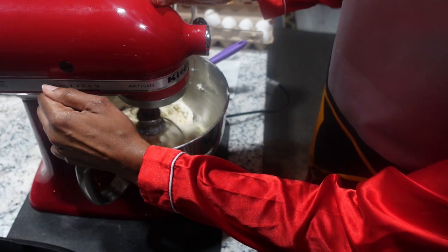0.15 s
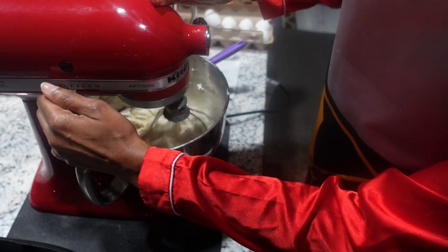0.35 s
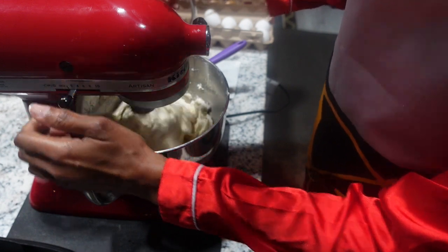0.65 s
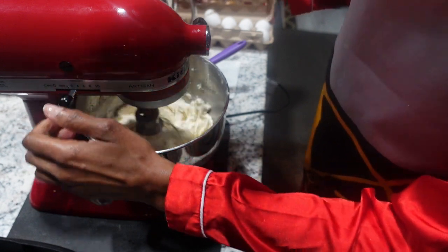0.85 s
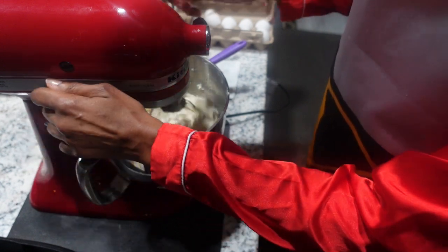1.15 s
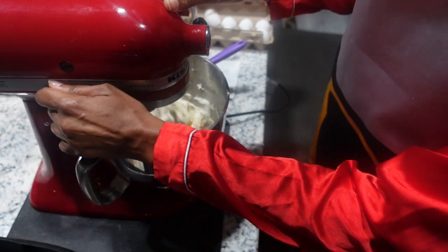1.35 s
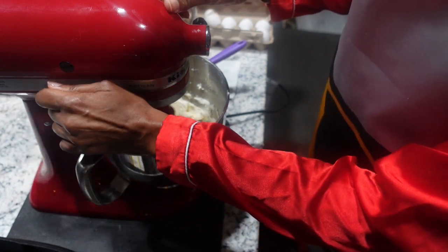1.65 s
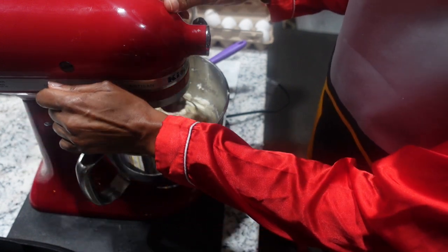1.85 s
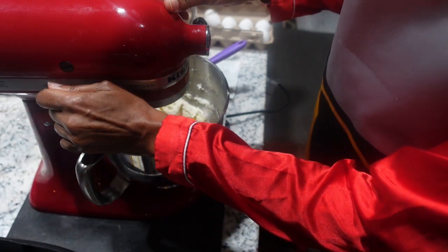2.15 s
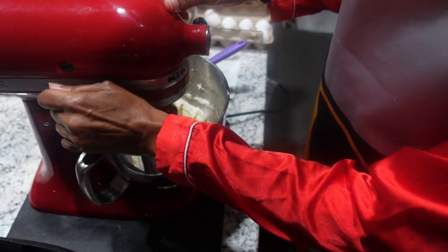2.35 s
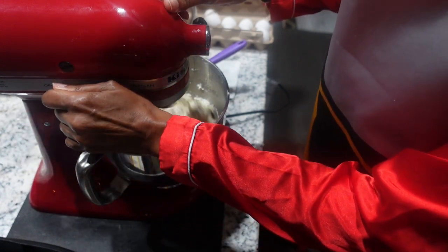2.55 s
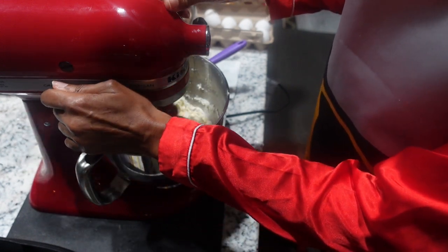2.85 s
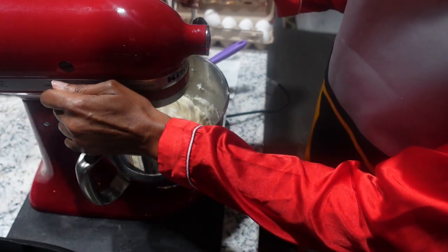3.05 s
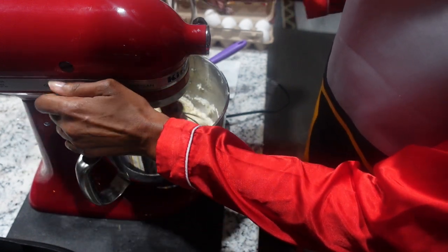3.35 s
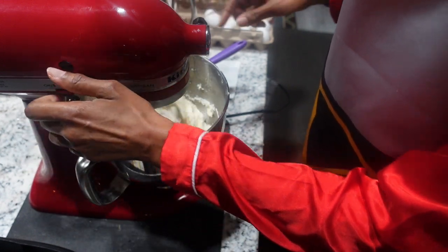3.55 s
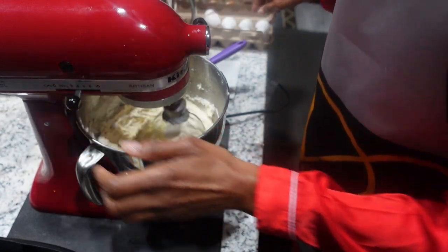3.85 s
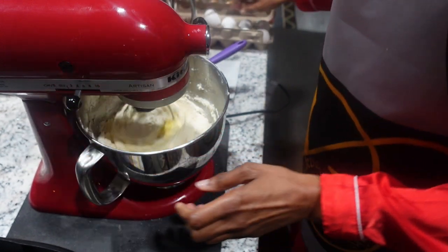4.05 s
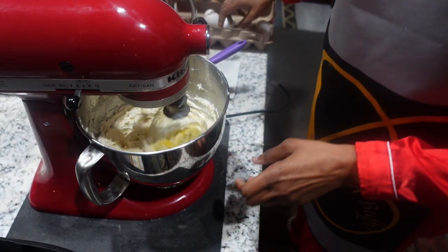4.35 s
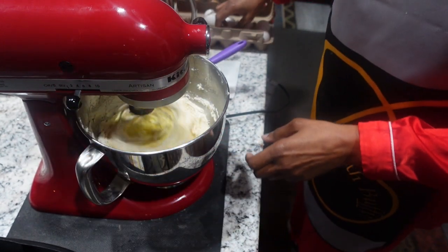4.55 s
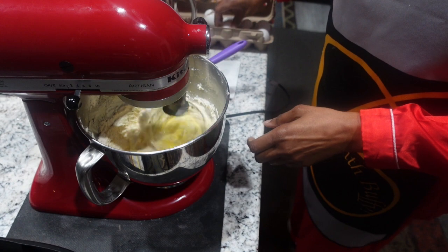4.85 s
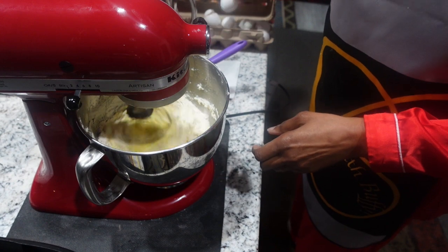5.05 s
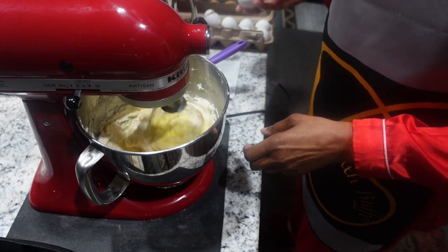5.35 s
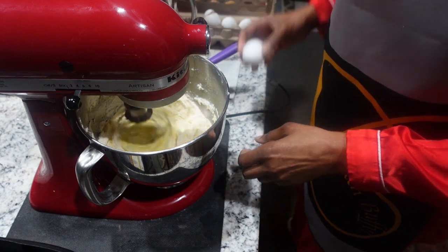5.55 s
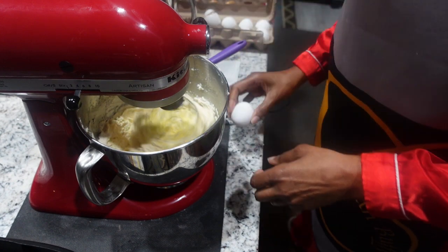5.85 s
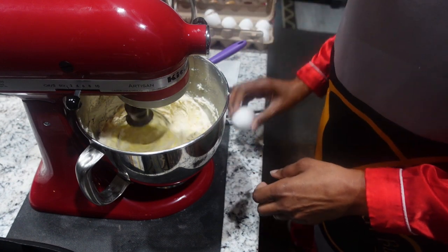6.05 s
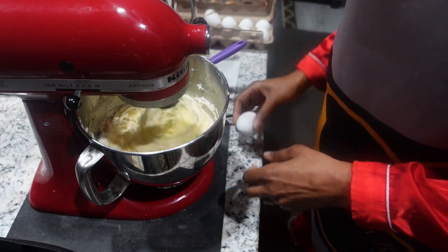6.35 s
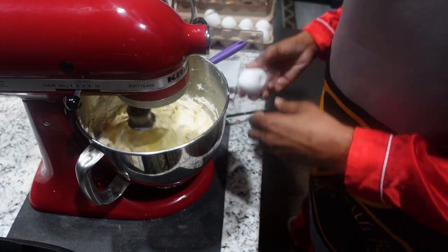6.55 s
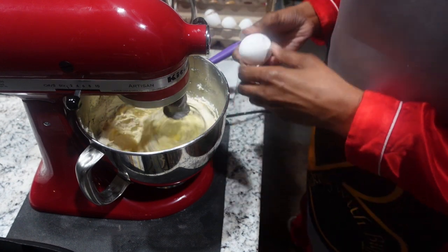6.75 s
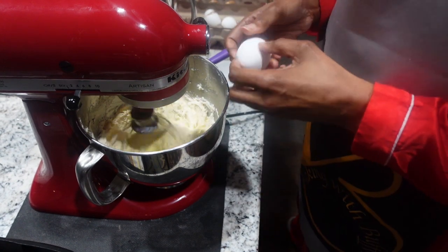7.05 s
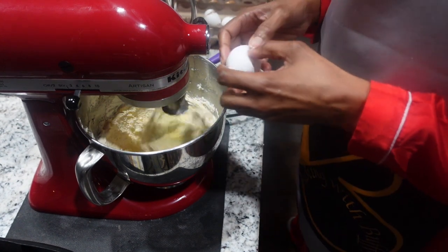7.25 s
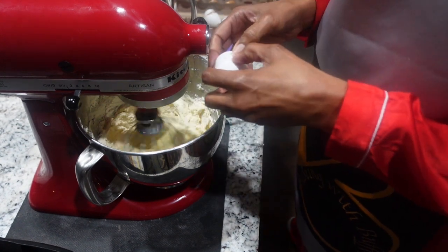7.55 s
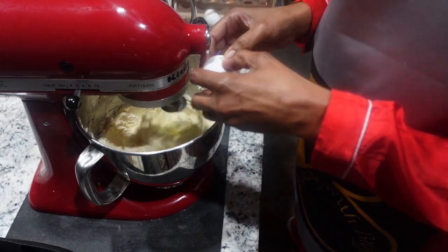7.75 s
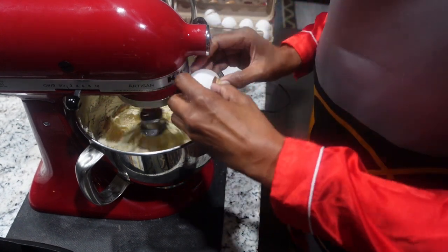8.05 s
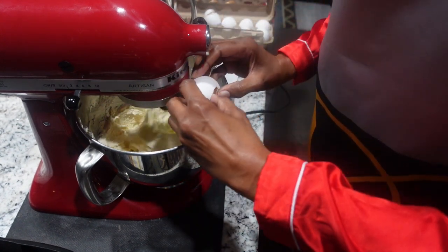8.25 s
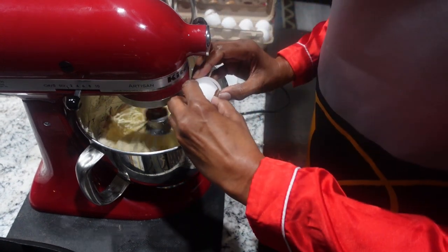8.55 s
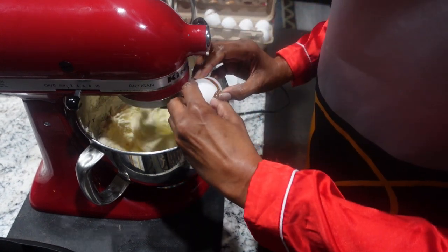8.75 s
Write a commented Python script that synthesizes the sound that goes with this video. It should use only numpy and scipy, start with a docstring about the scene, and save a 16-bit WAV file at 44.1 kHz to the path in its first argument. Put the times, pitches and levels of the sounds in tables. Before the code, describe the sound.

A stand mixer dominates throughout, heard close in a kitchen with only a short room tail. First a slow buzzing motor with chirping brush squeak and a light lever click; then a quick climb in pitch with gear chatter into a brighter, steadier fast whine, gently pulsing as the whisk circles the batter. An egg is tapped hard, then its shell snaps faintly apart near the end.

```python
"""A stand mixer's motor hums and whines at slow speed, with brush hiss and squeaks, then surges to fast.
It whisks batter in a steel bowl; later an egg is knocked on the counter and its shell is broken open.
Motor tones are cosines locked to the shaft and the mains ripple, with resonances of the housing.
Gears and brushes are filtered noise that follows the turning shaft; the clicks are fading noise bursts."""
import sys
import numpy as np
from scipy import signal
from scipy.fft import rfft, irfft, next_fast_len
from scipy.io import wavfile
from scipy.ndimage import uniform_filter1d, minimum_filter1d, map_coordinates

SR = 44100
rng = np.random.default_rng(int(sys.argv[2]) if len(sys.argv) > 2 else 0)


def to_wav(sig):
    """Store sig (one row per channel, or 1-D mono) as 16-bit WAV at the path in sys.argv[1].

    Samples outside -1..1 are clipped; the rate is SR.
    """
    pcm = np.clip(np.atleast_2d(sig), -1, 1) * 32767
    pcm = np.round(pcm).astype(np.int16)
    wavfile.write(sys.argv[1], SR, pcm.T)  # frames by channels


N = 393147
TIME = np.arange(N) / SR  # seconds

# motor speed set by the lever, before the whisk's drag: (time [s], shaft speed [turns per second])
SHAFT_SPEED = [(0, 49.44), (.04, 49.43), (.15, 66), (.23, 67.6), (.39, 66.52), (1.44, 66.52), (2.01, 70.27),
               (2.35, 71.68), (2.43, 85.04), (2.5, 93.1), (2.6, 100.2), (2.68, 101), (2.9, 99.63),
               (3.3, 100.8), (3.6, 99.64), (4.2, 100.7), (4.5, 99.75), (4.85, 98.38), (5.4, 98.43),
               (5.7, 99.62), (6.5, 98.94), (8.91, 98.59)]
# shaft speeds taken as slow and fast, and the ripple of the mains current
SLOW_HZ, FAST_HZ, RIPPLE_HZ = 67, 99, 120
# armature slots; motor turns in each worm gear throb; motor turns in each orbit of the whisk
SLOTS, WORM_RATIO, ORBIT_RATIO = 22, 5, 47.7
# motor tones at shaft order x speed + ripple order x ripple, before resonance and level changes:
# (shaft order [-], ripple order [-], slow level [dB], fast level [dB])
MOTOR_TONES = [(0, 1, -67.5, -66), (1, 2, -56, -39.5), (0, 3, -42.5, -39.5), (3, 1, -49, -40.5),
               (0, 3.5, -40, -43), (-1, 4, -31.5, -54), (1, 3, -28.5, -45), (-2, 5, -59, -50),
               (-3, 6, -54, -38), (2, 2, -59, -38.5), (0, 4, -50, -40.5), (-1, 6, -47.5, -62),
               (1, 5, -47.5, -35.5), (0, 6, -46, -43), (-2, 7, -39.5, -56), (-4, 8, -53, -53),
               (-1, 7, -36.5, -43.5), (-2, 8, -66, -48), (1, 6, -45, -79), (9, 0, -107, -44),
               (10, 0, -63, -38.5), (15, 0, -55, -50.5), (22, -3, -64, -47.5), (22, -2, -39, -49),
               (22, -1, -41, -41.5), (22, 0, -40, -41), (22, 1, -39, -50.5), (22, 2, -64, -46.5),
               (21, 0, -44, -49.5), (21, 1, -68, -50.5), (23, -1, -68, -55), (23, 0, -44, -49),
               (29, 0, -46, -53), (44, -1, -72, -45), (43, 0, -61, -49.5), (44, 0, -47.5, -43.5),
               (44, 1, -56, -38), (44, 2, -50.5, -45.5), (43, 1, -57, -58), (45, 0, -58, -40.5),
               (66, 0, -51, -42.5), (66, 1, -44.5, -47), (88, 0, -68, -44)]
# sharp housing resonances that the motor tones sweep through: (frequency [Hz], width [Hz], height [dB])
SHARP_HOUSING = [(2162, 44.6, 20), (2962.3, 124, 6), (3950, 190, 7)]
# gear and brush noise at slow and at fast speed, before resonance: (frequency [Hz], level [dB per Hz])
SLOW_NOISE = [(25, -86), (90, -87.5), (200, -82), (320, -70), (560, -71), (900, -67.5), (1500, -70),
              (2600, -74), (4500, -72), (5300, -82), (6100, -69), (8000, -79.5), (11000, -79),
              (15500, -91.5)]
FAST_NOISE = [(25, -91), (90, -91), (200, -82), (320, -69.5), (560, -72), (900, -63.5), (1300, -73),
              (2000, -68.5), (2900, -75.5), (4200, -72.5), (5300, -78.5), (6900, -71), (10000, -79.5),
              (15500, -90)]
# housing resonances that colour this noise: (frequency [Hz], width [Hz], height [dB])
NOISE_HOUSING = [(150, 32, 2.5), (328, 44, 5.5), (419.3, 34, 14), (685, 47, 2.5), (752, 21, 7.5),
                 (1100, 35, 10), (1487, 52, 3.5), (2124, 70, 8), (3010, 100, -3.5), (7200, 130, -11)]
# brush rasp around multiples of the slot rate, before the contact gate:
# (multiple [-], slow level [dB], fast level [dB])
RASP_BANDS = [(2, -49, -56), (3, -55, -45), (4, -48, -48.5), (5, -50.5, -51.5), (6, -53, -54.5),
              (7, -55, -71)]
# overall brush squeak, before the contact gate and throb: (time [s], level [dB])
SQUEAK_LEVEL = [(0, -81), (.3, -58), (.9, -48), (1.1, -47), (1.55, -41), (1.9, -45), (2.2, -46.5),
                (2.45, -67)]
# the bands that make up the squeak: (frequency [Hz], width [Hz], relative level [dB])
SQUEAK_BANDS = [(4390, 590, -3.5), (5030, 290, -3), (6270, 500, -14), (8560, 500, -14), (10430, 140, -2),
                (14800, 400, -22)]
# faint mains hum: (time [s], level [dB])
MAINS_LEVEL = [(0, -62), (.2, -63), (.5, -54), (2.4, -70), (2.6, -61), (4.05, -77), (5.6, -69), (6.3, -76),
               (8.91, -75)]
# clicks of speed lever, eggshell and bowl, levels before fading:
# (time [s], crack level [dB], knock level [dB], crack's 60 dB fading time [s], resonance [Hz])
CLICK_EVENTS = [(.078, -25, -36, 0.034, 5670), (1.575, -29, -46, 0.034, 7496),
                (5.625, -43, -23.5, 0.079, 1100), (6.132, -9, -30, .017, 5400),
                (6.15, -30, -31, 0.14, 1686), (7.143, -30, -32, .025, 3400), (7.186, -31, -47, .02, 5800),
                (8.797, -14, -32, .016, 2900), (8.83, -36, -47, 0.013, 12370)]
# tone colour of every crack and every knock: (frequency [Hz], relative level [dB])
CRACK_COLOUR = [(500, -26), (1800, 10), (2900, 6.5), (4000, -2), (5400, 3.5), (9000, 4), (13000, 2.5),
                (16000, 2)]
KNOCK_COLOUR = [(60, -42), (170, -4), (350, 1), (1100, 3), (2000, -11), (3500, -16), (8000, -31)]
# balance of the microphone pair: (frequency [Hz], left minus right [dB])
STEREO_TILT = [(60, 0.0), (110, -1.5), (200, 1.5), (380, -0.5), (700, 2), (1290, 2), (2380, 2.5),
               (4400, 3.5), (8120, 3.5), (15000, 3.5)]
# how alike the noise is at the two microphones: (frequency [Hz], likeness [0-1])
STEREO_LIKENESS = [(60, 0.6), (130, 0.6), (290, 1.0), (640, 0.94), (1410, 0.92), (3100, 0.96), (6820, 1),
                   (15000, 0.88)]
# the whine shifts between the ears as the cook moves: (time [s], left minus right [dB])
WHINE_BALANCE = [(0, 2.5), (3.2, 1), (4.4, 1.5), (6, 1), (8.2, -1.8)]
# level changes of the whine and of the low hum: (time [s], level [dB])
WHINE_LEVEL = [(0, -3), (.1, 3), (.2, -3.5), (1, -0.5), (2, -7), (2.53, 3), (2.63, -1), (3.75, 1),
               (4.15, -3), (4.6, 3.5), (5.2, 1), (5.5, -5), (5.87, 2), (6.15, 0), (6.45, 3), (7.15, -1.5),
               (8.15, 2.5), (8.91, 1)]
HUM_LEVEL = [(0, 2), (.1, -3), (.2, 5.5), (.5, 1), (1, 3), (2.35, 3), (2.95, -0.5), (3.3, 3), (3.5, -2),
             (3.85, 2), (4.5, 0), (5.45, 0), (5.65, 1.5), (8.91, 0)]

# strength of modulation: brush catch when slow, flutter when fast, worm gear throb
CATCH, FLUTTER, THROB = .45, .11, .55
# the whisk runs freest at this share of each orbit
FREE_AT = .13
# at full drag: speed lost when fast (Hz), change of the whine (dB), damping of the bowl's band (dB)
DRAG_SAG_HZ, DRAG_WHINE_DB, DRAG_DAMPING_DB = 0.244, -0.2, 1.5
BOWL_HZ, BOWL_WIDTH_HZ = 730, 220
FRICTION_SLOW_DB, FRICTION_FAST_DB = -0.86, .5
WHINE_LEAD_S = .000017  # the whine reaches the left microphone first
SHELL_DB = 11  # height of the resonance in each crack
CRUMBLE_S = .0018  # a crack stays at full strength this long before it dies away
EDGE_HZ = 15850  # upper edge of the finished sound


def amp(db):
    """Turns decibels into a gain."""
    return 10 ** (np.asarray(db) / 20)


def unit(x):
    """Scales a sound to an average strength (rms) of 1."""
    return x / np.sqrt(np.mean(abs(x) ** 2) + 1e-20)


def curve(rows):
    """Joins points by straight lines in time."""
    return np.interp(TIME, *np.transpose(rows))


def read(points, hz):
    """Reads a spectrum, joined by straight lines over log frequency."""
    f, value = np.transpose(points)
    return np.interp(np.log(hz + 1), np.log(f + 1), value)


def colour(x, gain):
    """Filters a sound by a gain that depends on frequency."""
    size = next_fast_len(x.shape[-1])
    spectrum = rfft(x, size) * gain(np.fft.rfftfreq(size, 1 / SR))
    return irfft(spectrum, size)[..., :x.shape[-1]]


def lift(hz, modes):
    """Gain of resonances that stand above a flat response."""
    power = sum(amp(db) ** 2 / (1 + (2 * (hz - f) / width) ** 2) for f, width, db in modes)
    return np.sqrt(1 + power)


def drift(rate_hz, size=8192):
    """Slow complex random wandering of rms 1; a higher rate wanders faster."""
    z = rng.standard_normal((size, 2)) @ [1, 1j]
    hz = np.fft.fftfreq(size, N / SR / size)
    z = np.fft.ifft(z / (1 + (hz / rate_hz) ** 2))
    return np.interp(TIME, np.linspace(0, N / SR, size), unit(z))


def wave(turns):
    """A cosine of a phase given in turns."""
    return np.cos(2 * np.pi * turns)


def noise_band(wander, turns):
    """Shifts random wandering up to a carrier tone, giving a narrow band of noise of rms 1."""
    return unit((wander * np.exp(2j * np.pi * turns)).real)


def mains_hum():
    """A faint steady tone at the mains frequency, half the ripple rate."""
    return amp(curve(MAINS_LEVEL)) * unit(wave(RIPPLE_HZ / 2 * TIME))


def clicks(shell_q=6, tail_db=-25, tail_t60=0.56, knock_rise_s=0.0027):
    """Each blow is a bright crack over a dull knock, followed by the short tail of the kitchen."""
    out = np.zeros((2, N))
    t = TIME[:SR // 2]
    for start_s, crack_db, knock_db, t60, shell_hz in CLICK_EVENTS:
        shell = [(shell_hz, shell_hz / shell_q, SHELL_DB)]
        # three noises each: one shared direct sound, then a tail for each ear
        noise = rng.standard_normal((2, 3, len(t)))
        crack = colour(noise[0], lambda hz: amp(read(CRACK_COLOUR, hz)) * lift(hz, shell))
        knock = colour(noise[1], lambda hz: amp(read(KNOCK_COLOUR, hz)))
        burst = amp(crack_db) * unit(crack)
        burst += amp(knock_db) * unit(knock) * (1 - np.exp(-t / knock_rise_s))
        direct = burst[0] * amp(-60 * np.maximum(t - CRUMBLE_S, 0) / t60)
        tail = burst[1:] * amp(tail_db - 60 * t / tail_t60)
        hit = direct + tail
        part = out[:, round(start_s * SR):][:, :len(t)]
        part += hit[:, :part.shape[1]]
    return out


def brush_contact(turns, fast, unequal=0.51):
    """The two brushes catch twice a turn when slow; when fast they flutter with shaft and ripple."""
    catch = ((1 + wave(2 * turns)) / 2) ** 4
    slow_gate = unit(1 + 2 * CATCH * catch * (1 + unequal * wave(turns)))
    fast_gate = 1 + FLUTTER * (wave(turns) + wave(RIPPLE_HZ * TIME))
    return slow_gate + (fast_gate - slow_gate) * fast


def brush_squeak(turns, contact):
    """High resonances chirp at each catch and throb with the worm gear."""
    ring = sum(amp(db) * noise_band(drift(width / 2), hz * TIME) for hz, width, db in SQUEAK_BANDS)
    throb = 1 + THROB * wave(turns / WORM_RATIO)
    return amp(curve(SQUEAK_LEVEL)) * ring * contact ** 2 * throb


def brush_rasp(turns, fast, width_hz=170):
    """Uneven commutator bars smear the upper harmonics of the whine into narrow bands."""
    rasp = 0
    for multiple, slow_db, fast_db in RASP_BANDS:
        level = amp(slow_db + (fast_db - slow_db) * fast)
        rasp += level * noise_band(drift(width_hz), multiple * SLOTS * turns)
    return rasp


def gears_and_brushes(turns, fast, contact, repeat=0.39, split_hz=3500, size=440):
    """Friction noise, part of it repeating with each turn, coloured by the housing."""
    worn = map_coordinates(rng.standard_normal(size), [turns % 1 * size], mode="grid-wrap")
    near = unit(rng.standard_normal(N) + repeat * worn)
    other = rng.standard_normal(N)

    def same(hz):
        return np.clip(read(STEREO_LIKENESS, hz), 0, 1)

    # shared noise, plus a second noise that is flipped between the ears
    middle = colour(near, lambda hz: np.sqrt((1 + same(hz)) / 2))
    side = colour(other, lambda hz: np.sqrt((1 - same(hz)) / 2))
    pair = middle + np.outer([1, -1], side)

    def housed(spectrum):
        # the square root turns a level per Hz into a gain for white noise
        return colour(pair, lambda hz: amp(read(spectrum, hz)) * lift(hz, NOISE_HOUSING) * np.sqrt(SR / 2))

    noise = amp(FRICTION_SLOW_DB) * housed(SLOW_NOISE) * (1 - fast)
    noise += amp(FRICTION_FAST_DB) * housed(FAST_NOISE) * fast
    gears = colour(noise, lambda hz: 1 / (1 + (hz / split_hz) ** 4))
    brushes = noise - gears
    return gears + brushes * contact


def gear_strain(turns, surge, level_db=-33, width_hz=200):
    """Under hard acceleration the gears chatter in a wide, rough band around the slot rate."""
    return amp(level_db) * surge * noise_band(drift(width_hz), SLOTS * turns)


def whisk_drag(speed):
    """The batter's drag on the whisk, from -1 (running free) to 1 (digging in), once in each orbit."""
    orbits = np.cumsum(speed) / SR / ORBIT_RATIO
    return -wave(orbits - FREE_AT)


def bowl(x, drag):
    """The bowl's band swells while the whisk runs free and sinks while it digs in."""
    band = colour(x, lambda hz: 1 / (1 + (2 * (hz - BOWL_HZ) / BOWL_WIDTH_HZ) ** 4))
    return x + band * (amp(-DRAG_DAMPING_DB * drag) - 1)


def motor_tones(speed, turns, fast, surge, drag, slow_rough=0.21, fast_rough=0.23, whine_rough=0.22,
                overtone_rough=0.31, shared_rough=0.18, rough_hz=7, surge_db=8, dulling_db=4):
    """The mains ripple and the turning armature modulate each other; close tones beat and throb."""
    hum, whine, overtones = np.zeros((3, N))
    for shaft, ripple, slow_db, fast_db in MOTOR_TONES:  # a half ripple order is an odd mains harmonic
        tone_hz = shaft * speed + ripple * RIPPLE_HZ
        gain = amp(slow_db + (fast_db - slow_db) * fast) * lift(tone_hz, SHARP_HOUSING)
        # the slot tone and its nearest sidebands start in step, so the whine pulses with the current
        start = 0 if shaft == SLOTS and abs(ripple) <= 1 else rng.random()
        if shaft < SLOTS - 1:
            layer, rough = hum, slow_rough + (fast_rough - slow_rough) * fast
        elif shaft <= SLOTS + 1:
            layer, rough = whine, whine_rough
        else:
            layer, rough = overtones, overtone_rough
        # roughness wavers both the loudness and the phase of a tone
        waver = 1 + rough * drift(rough_hz)
        phase = shaft * turns + ripple * RIPPLE_HZ * TIME + start + np.angle(waver) / (2 * np.pi)
        layer += gain * abs(waver) * wave(phase)
    # the whine is louder during acceleration and moves slightly with the whisk's drag
    current = 1 + shared_rough * drift(2 * rough_hz).real
    whine *= amp(curve(WHINE_LEVEL) + surge_db * surge + DRAG_WHINE_DB * drag) * current
    hum *= amp(curve(HUM_LEVEL))
    overtones *= amp(-dulling_db * np.sqrt(surge))
    return hum, whine, overtones


def place_whine(whine):
    """Spreads the whine over the two microphones by level and arrival time."""
    pair = colour(whine, lambda hz: np.exp(2j * np.pi * np.outer([.5, -.5], hz) * WHINE_LEAD_S))
    return pair * amp(np.outer([.5, -.5], curve(WHINE_BALANCE)))


def scene():
    """One shaft drives the mixer's moving parts; mains hum and clicks join them in stereo."""
    set_speed = curve(SHAFT_SPEED)
    drag = whisk_drag(set_speed)
    fast = np.clip((set_speed - SLOW_HZ) / (FAST_HZ - SLOW_HZ), 0, 1)  # 0 is slow, 1 is fast
    speed = set_speed - DRAG_SAG_HZ * drag * fast
    turns = np.cumsum(speed) / SR
    # the strain of speeding up grows with both acceleration and speed
    strain = uniform_filter1d(np.gradient(set_speed), size=1500) * set_speed ** 4
    surge = np.maximum(strain / strain.max(), 0)
    contact = brush_contact(turns, fast)

    hum, whine, overtones = motor_tones(speed, turns, fast, surge, drag)
    brushes = brush_rasp(turns, fast) * contact + brush_squeak(turns, contact)
    body = bowl(hum + gears_and_brushes(turns, fast, contact), drag)
    body = body + overtones + gear_strain(turns, surge) + brushes + mains_hum() + clicks()
    tilted = colour(body, lambda hz: amp(np.outer([.5, -.5], read(STEREO_TILT, hz))))
    return tilted + place_whine(whine)


def record(dry, ceiling_db=-7.5, recovery_db_per_s=430):
    """A look-ahead limiter dips the level around the sharpest peaks; then the top treble is cut."""
    over_db = np.maximum(20 * np.log10(abs(dry).max(0) + 1e-9) - ceiling_db, 0)
    # each dip recovers along a straight line in decibels
    fall = TIME * recovery_db_per_s
    recovery_db = fall - np.maximum.accumulate(over_db + fall)
    duck_db = minimum_filter1d(recovery_db, size=160)
    limited = dry * amp(uniform_filter1d(duck_db, size=80))
    low_pass = signal.firwin(511, EDGE_HZ, window=("kaiser", 9), fs=SR)
    return signal.oaconvolve(limited, low_pass[None], "same")


dry = scene()
out = record(dry)
to_wav(out)
```